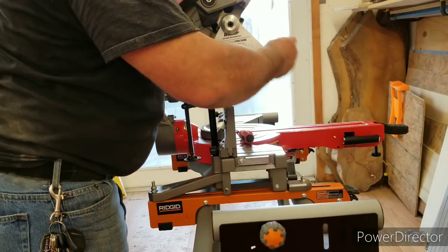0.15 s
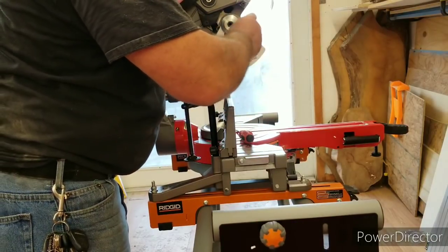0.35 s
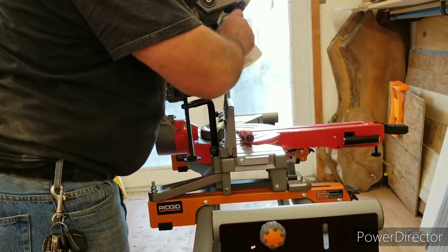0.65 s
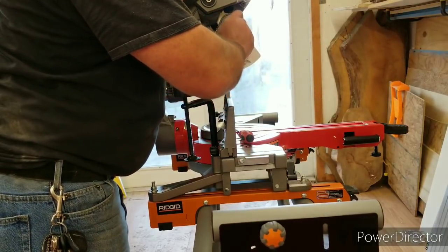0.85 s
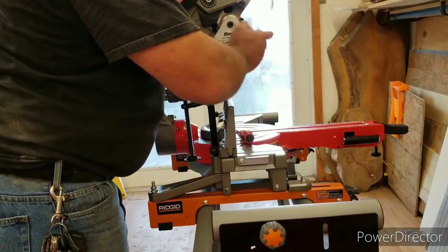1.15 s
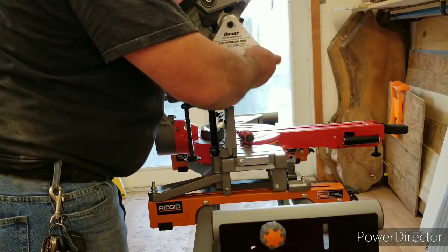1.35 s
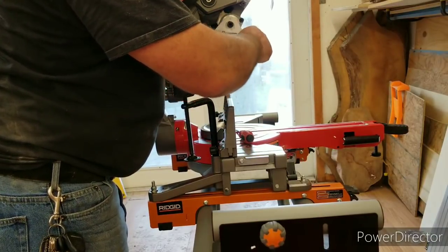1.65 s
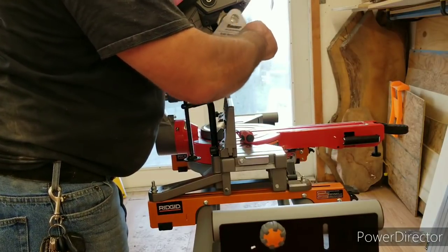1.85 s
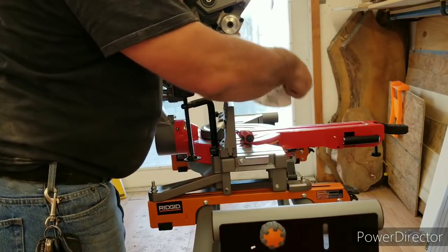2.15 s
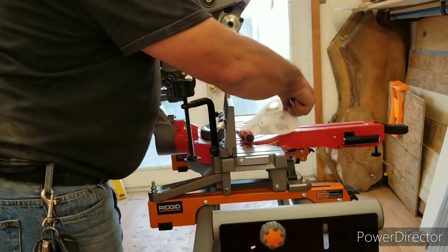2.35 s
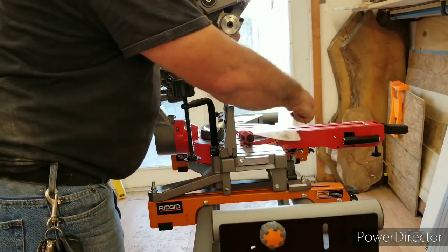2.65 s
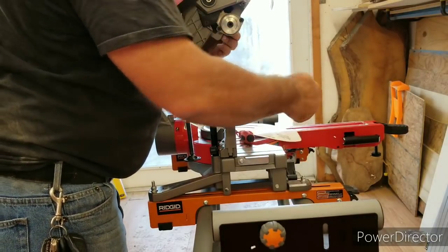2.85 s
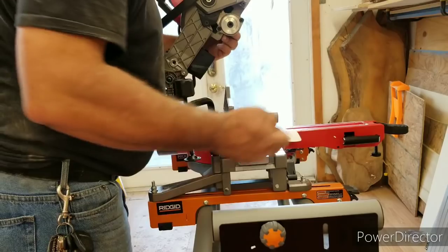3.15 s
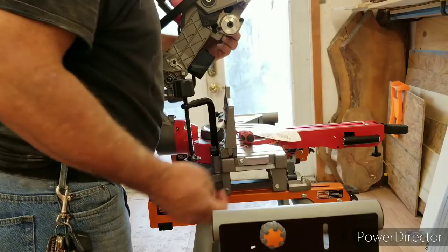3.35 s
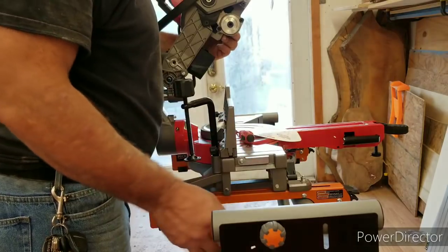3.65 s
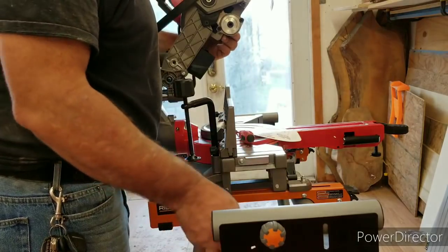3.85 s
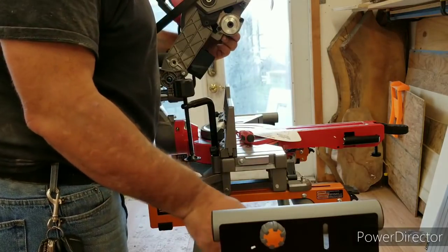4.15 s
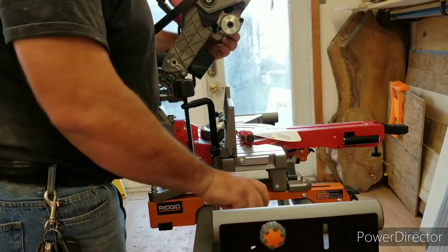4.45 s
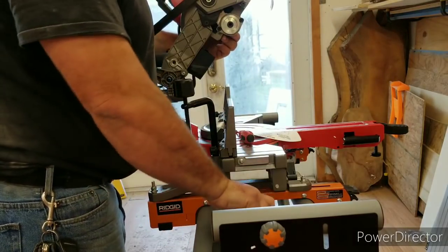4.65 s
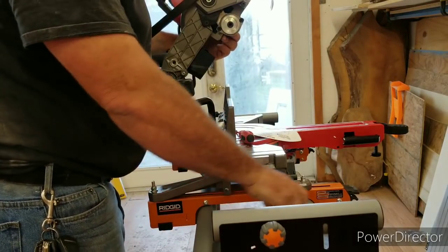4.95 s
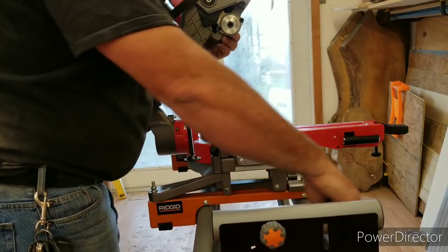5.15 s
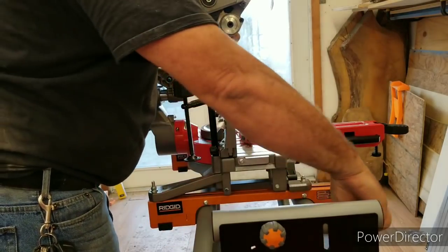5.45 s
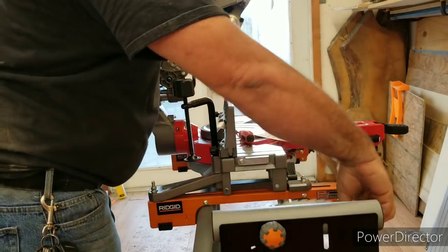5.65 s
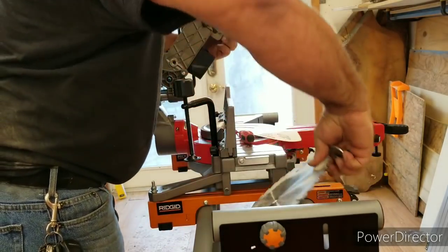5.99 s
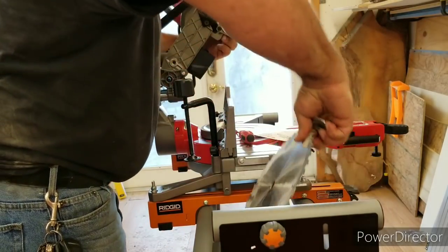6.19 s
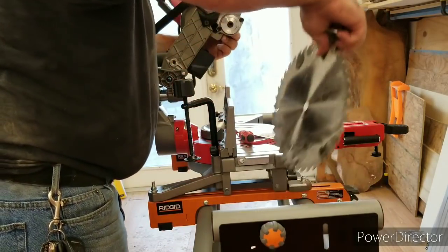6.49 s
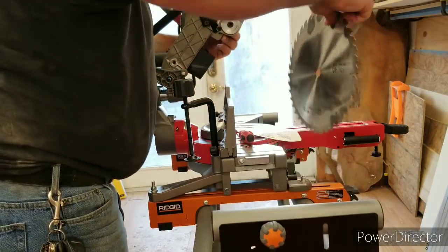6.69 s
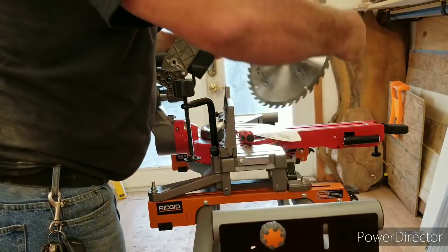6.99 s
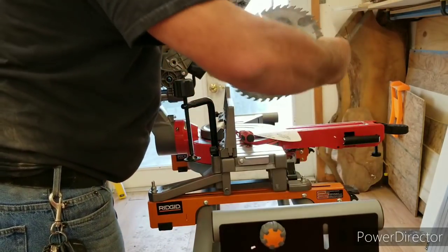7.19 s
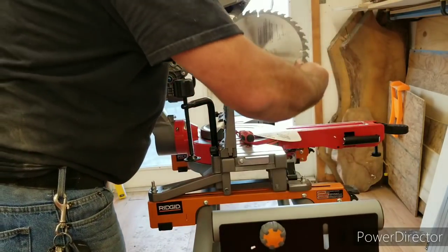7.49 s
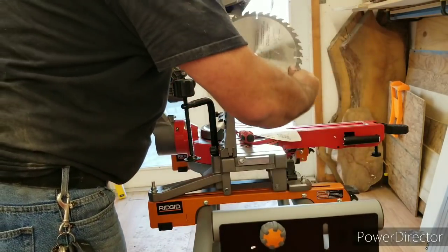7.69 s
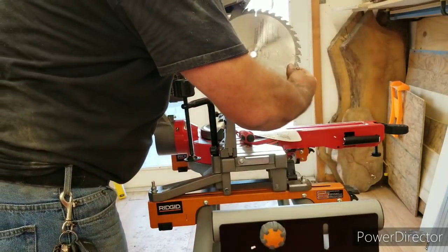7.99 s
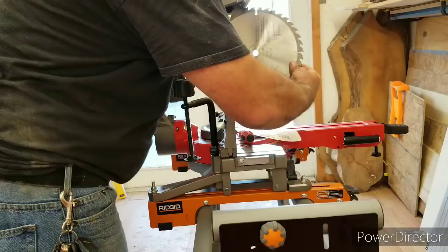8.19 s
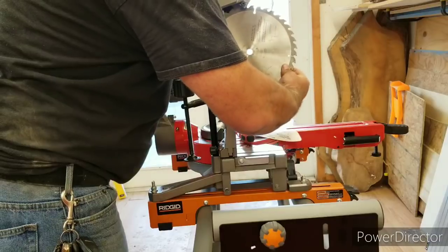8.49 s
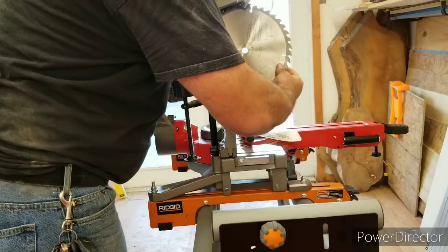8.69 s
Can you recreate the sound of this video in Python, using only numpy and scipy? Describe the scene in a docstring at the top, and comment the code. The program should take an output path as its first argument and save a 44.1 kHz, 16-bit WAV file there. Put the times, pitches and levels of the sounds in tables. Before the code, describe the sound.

Right at the start a steel wrench clatters loudly onto a saw stand, bouncing and rocking for about half a second, its clear high tones lingering past 1 second. Everything after is much quieter. A draught rumbles on the microphone around 1 second, a tiny steel part chinks at 1.3, and something knocks at 1.7. Faint rustles of hands and packaging and light taps continue to about 3.5 seconds. The draught buffets again from 3.7 to 4.6. At 5.5 a circular saw blade is picked up with a quick rattling clank and rings faintly until a dull bump stops it at 6.1. After more soft rustling, a clunk comes at 7.9 and the blade clinks against its shaft at 8.1. It grinds on briefly from 8.5, ending with a few knocks near 8.8. A low hum and short workshop reverberation lie underneath throughout.

```python
"""A steel wrench clatters down in a workshop: each bounce cracks, thuds and rings the head; clear shank
tones join in and linger. Hands and packaging rustle, parts knock on a saw stand, and a circular blade
is lifted, rings on and grinds onto its arbor. A draught buffets the two microphone ports and a low hum
fills the shop. The recorder turns itself down on the clatter and slowly comes back."""
import sys
import numpy as np
from scipy import signal
from scipy.fft import rfft, irfft, next_fast_len
from scipy.io import wavfile
from scipy.ndimage import uniform_filter1d

SR = 44100
rng = np.random.default_rng(int(sys.argv[2]) if len(sys.argv) > 2 else 0)


def generate_wav(sig):
    """Save sig (samples, or channels by samples) to the path in sys.argv[1] as 16-bit PCM at SR."""
    pcm = np.round(np.clip(np.atleast_2d(sig).T, -1, 1) * 32767).astype(np.int16)
    wavfile.write(sys.argv[1], SR, pcm)


N = 389403


def gain(db):
    """Decibels to amplitude."""
    return 10 ** (np.asarray(db) / 20)


def unit_rms(x):
    """Scales a signal to rms 1."""
    return x / np.sqrt(np.mean(x ** 2) + 1e-20)


def curve_at(points, hz):
    """Reads a breakpoint curve over log frequency."""
    f, value = np.transpose(points)
    return np.interp(np.log(hz + 1), np.log(f + 1), value)


def place(mix, at_s, sound, pan_db=0):
    """Drops a sound into the stereo mix; pan is left level minus right."""
    part = mix[:, round(at_s * SR):][:, :sound.shape[-1]]
    part += sound[..., :part.shape[1]] * gain([[pan_db / 2], [-pan_db / 2]])


def flutter(size, smooth_samples):
    """A random modulator of rms 1."""
    return unit_rms(uniform_filter1d(rng.standard_normal(size), smooth_samples))


def noise(size, spectrum, tilt_db=0):
    """Coloured noise of rms 1, tilted by tilt_db per octave."""
    hz = np.fft.rfftfreq(size, 1 / SR)
    eq_db = curve_at(spectrum, hz) + tilt_db * np.log2(hz / 2000 + .01)
    return unit_rms(irfft(rfft(rng.standard_normal(size)) * gain(eq_db), size))


def burst(spectrum, t60, tilt_db=0, rise=0.0011):
    """An impact transient: coloured noise with a fast attack and decay."""
    t = np.arange(4096) / SR
    return noise(4096, spectrum, tilt_db) * gain(-60 * t / t60) * (1 - np.exp(-t / rise))


def ring(modes, seconds, split, count=3, rise=.0011):
    """Dying sines; contact splits each mode into close, beating tones, wider for short modes."""
    hz, db, t60 = np.repeat(modes, count, axis=0).T[:, :, None]
    t = np.arange(round(seconds * SR)) / SR
    hz = hz * (1 + split / t60 * rng.standard_normal(hz.shape))
    db = db + 1.8 * rng.standard_normal(hz.shape)
    tones = gain(db - 60 * t / t60) * np.sin(2 * np.pi * (hz * t + rng.random(hz.shape)))
    return tones.sum(0) * (1 - t / seconds) * (1 - np.exp(-t / rise))


def stereo_pair(left, other, correlation, hz):
    """Blends two unrelated spectrograms into a pair with a set width in each band."""
    alike = curve_at(correlation, hz)[:, None]
    return np.array([left, alike * left + np.sqrt(1 - alike ** 2) * other])


HUM_EQ = [(15, -38), (25, -8.5), (76, -1), (144, -12.5), (211, -18), (284, 0.5), (371, -5), (425, -3),
          (620, -13), (857, -11.5), (1010, -15.5), (1280, -25.5), (6490, -39), (14200, -35.5),
          (15800, -44.5)]  # colour of the room tone: f/Hz, level/dB
HUM_CORRELATION = [(60, 0.91), (180, 0.92), (550, 0.73), (1650, -0.12), (4970, -0.36), (15000, -0.43)]  # its stereo image: f/Hz, left-right correlation


def shop_hum():
    """The bed: steady low room noise with faint drifting patches."""
    frames, hz = N // 256 + 5, np.fft.rfftfreq(1024, 1 / SR)
    left_re, left_im, other_re, other_im, patches = rng.standard_normal((frames, 513, 5)).T
    patches = unit_rms(uniform_filter1d(uniform_filter1d(patches, 10, 0), 16, 1))
    bands = stereo_pair(left_re + 1j * left_im, other_re + 1j * other_im, HUM_CORRELATION, hz)
    bands *= gain(curve_at(HUM_EQ, hz)[:, None] + 2.1 * patches)
    return gain(-55.5) * unit_rms(signal.istft(bands, nperseg=1024, noverlap=768)[1][:, :N])


DRAUGHT_FADER = [(0.0, -50, 7), (0.27, -67, -2), (0.66, -51, 0), (0.9, -39.5, 9), (1.06, -44, -4),
                 (1.25, -47, -7), (1.38, -42.5, 8), (1.57, -51.5, -10.5), (1.72, -72, 0.5), (3.12, -72, 4),
                 (3.459, -48.5, 1), (3.69, -47.5, -1.5), (3.75, -39, 10), (3.91, -35.5, 13),
                 (4.0, -39.5, 0.5), (4.3, -36, -2), (4.6, -48.5, -5), (4.69, -61, 3), (6.5, -70.5, 4.5),
                 (6.69, -48, 2.5), (6.8, -67, 0.5), (7.35, -58, -1.5), (8.83, -64, 3)]  # swells of moving air: t/s, level/dB, pan/dB
BUFFET_EQ = [(12, -39), (20, -13.5), (53, 2), (103, 1.5), (145, -6), (211, -12.5), (284, -13.5),
             (325, -19.5), (500, -37), (650, -55), (1100, -120)]  # colour of the rumble: f/Hz, level/dB
PUFFS = [(.874, -33, 109.5, 13), (0.927, -33, 110, -18), (.978, -37.5, 111, -25), (1.059, -31.5, 110, -19),
         (1.08, -35.5, 112, -23), (1.2, -38.5, 108.7, -19.5), (1.339, -34, 111, -13), (1.39, -40, 111, 3),
         (3.744, -34.5, 122, 14), (3.793, -33.5, 99, 24), (3.873, -26, 142, 22.5), (3.897, -31.5, 124, 26),
         (4.01, -34.5, 69, 11.5), (4.1, -33.5, 121, -4.5), (4.173, -28, 64.6, -12), (4.256, -33, 140, 8),
         (4.276, -38, 119.4, -18), (4.393, -37.5, 120, -9.5), (4.502, -40, 110, -9), (4.742, -42, 89, -5),
         (4.895, -46, 90, -4.5), (7.34, -39, 129, 4.5), (7.382, -43, 129, -3), (8.051, -41.5, 80.5, -0.5)]  # the strongest single puffs: t/s, level/dB, f/Hz, pan/dB


def draught():
    """Air buffets each port separately: lumpy rumble, and puffs of about one cycle."""
    times, levels_db, pans_db = np.transpose(DRAUGHT_FADER)
    t, out = np.arange(N) / SR, np.zeros((2, N))
    for port, side in enumerate((.5, -.5)):
        lumps = unit_rms(uniform_filter1d(flutter(N, 1200), 1200))
        rumble = unit_rms(noise(next_fast_len(N), BUFFET_EQ)[:N] * gain(2.9 * lumps))
        out[port] = rumble * gain(np.interp(t, times, levels_db + side * pans_db))
    for at_s, db, hz, pan_db in PUFFS:
        cycles = np.arange(4000) / SR * hz
        envelope = 2 * (1 - np.exp(-cycles / 0.2)) * np.exp(-cycles / 0.72)
        place(out, at_s, gain(db) * np.sin(2 * np.pi * cycles) * envelope, pan_db)
    return out


BOUNCES = [(.0004, -24.5, -26.5, -6), (0.011, -5, -27, 4), (0.0226, 1, -25.5, -11),
           (.036, -3.5, -26.5, -13.5), (.055, -10, -21, -15), (0.278, -9, -33.5, -11.5),
           (0.3003, -7.5, -25, -9), (.314, -5.5, -23, -18), (.329, -15, -27.5, -13.5), (.396, -19, -29, -3),
           (0.4907, -13.5, -31, -13), (.503, -19.5, -37.5, -7), (0.52, -23.5, -47, -7.5),
           (0.561, -25.5, -37, -6.5)]  # wrench hits: t/s, crack level/dB, head level/dB, thud re crack/dB
# light, even taps as it rocks: start/s, end/s, crack level/dB, head level/dB, thud re crack/dB
ROCKING = [(0.113, .25, -29, -26, -15.5), (0.35, .46, -19.5, -21.5, -10)]
CRACK_EQ = [(590, -29), (1000, -9.5), (1350, -9.5), (1860, -9.5), (2450, -9.5), (3300, -7), (4200, -3.5),
            (5200, -5), (6100, -9), (7000, -12), (10700, -12.5), (11300, -24), (12600, -24), (15500, -34)]  # bright edge of steel on the stand: f/Hz, level/dB
THUD_EQ = [(59, -49.5), (100, -18), (225, -7), (284, -10.5), (342, -5), (436, -14), (826, 1.5), (1340, -15),
           (1600, -8), (2080, -39), (3520, -120)]  # body under each hit: f/Hz, level/dB
HEAD_MODES = [(6250, -19, 0.2), (7210, -6, 0.25), (9850, -13, 0.37), (10396, 5.5, 0.26),
              (12600, -1.5, 0.28), (14815, -6.5, .3)]  # ring of the wrench head: f/Hz, level/dB, t60/s


def wrench():
    """Each hit cracks, thuds on the stand and rings the head; returns close sound and reverb send."""
    tap_gap_s, tap_tilt_db = .04, -3.5  # taps are duller than bounces
    width, grit_db = .6, 3  # share of crack power unalike at the ports; depth of its uneven snaps
    hits, head = np.zeros((2, 2, 2 * SR))
    taps = [(at_s, *levels, tap_tilt_db)
            for start, end, *levels in ROCKING for at_s in np.arange(start, end, tap_gap_s)]
    for at_s, db, head_db, thud_db, *tilt_db in BOUNCES + taps:
        centre, *sides = (burst(CRACK_EQ, 0.07, *tilt_db, rise=0.002) for _ in range(3))
        crack = np.sqrt(1 - width) * centre + np.sqrt(width) * np.array(sides)
        crack *= gain(grit_db * flutter(4096, 30))
        place(hits, at_s, gain(db) * (crack + gain(thud_db) * burst(THUD_EQ, .05)))
        ringing = np.array([ring(HEAD_MODES, 0.33, .0006, rise=0.0033) for port in range(2)])
        place(head, at_s, gain(head_db) * ringing, pan_db=-2)
    close = gain(-4.5) * hits + gain(-1) * head + gain(-2.5) * stand_scatter(hits)
    # wood and card soak up the treble
    send = signal.sosfilt(signal.butter(2, 8500, fs=SR, output="sos"), hits + head)
    return np.pad([close, send], ((0, 0), (0, 0), (0, N - 2 * SR)))


def stand_scatter(hits, spread_s=.006):
    """Early reflections: the stand throws the clatter back, differently to each port."""
    shape = (2, round(spread_s * SR))
    taps = rng.choice([-1., 1.], shape) * (rng.random(shape) < .04)
    taps = signal.sosfilt(signal.butter(1, 600, "high", fs=SR, output="sos"), taps)
    taps /= np.linalg.norm(taps, axis=1, keepdims=True)
    return signal.oaconvolve(hits, taps, axes=1)[:, :hits.shape[1]]


CLUNKS = [(.012, -2, 870), (.2785, -4, 1550), (.3, -15, 510), (.395, -21, 560), (.425, -21, 700),
          (.4915, -13, 2100), (7.8498, -18.5, 570), (7.8555, -23.5, 535), (7.872, -24, 600),
          (8.099, -29.5, 694), (8.776, -33, 480)]  # dry blows on the stand: t/s, level/dB, f/Hz


def clunks(attack_cycles=.3, decay_cycles=1.5):
    """The punch of steel landing on the stand: a few cycles, close and dry."""
    out = np.zeros((2, N))
    for at_s, db, hz in CLUNKS:
        cycles = np.arange(1500) / SR * hz
        envelope = np.exp(-cycles / decay_cycles) * (1 - np.exp(-cycles / attack_cycles))
        place(out, at_s, gain(db) * np.sin(2 * np.pi * cycles) * envelope, pan_db=1.5)
    return out


SHANK_TONES = [(.14, .11, 2495, -26.5, .9), (.2, .078, 2500, -26.5, .6), (0.223, 0.046, 2990, -27, .4),
               (0.24, .07, 1176, -34.5, .6), (.3, 0.72, 1174, -32, 1.1), (.14, 0.15, 7229, -19.5, 0.72),
               (.335, .04, 6335, -26.5, .4), (.385, .055, 8900, -21, .4), (0.334, .3, 6790, -32, 1),
               (.43, .06, 2990, -30, .8), (0.48, 0.93, 6806, -26.5, 1.07), (0.55, 0.03, 2700, -25.5, .5),
               (0.51, 0.23, 2991, -27.5, 1.1)]  # ring of the wrench shank: t/s, length/s, f/Hz, level/dB, t60/s


def shank_ring(attack_s=.008):
    """The shank sings in clear tones, some brief, some fading slowly."""
    out = np.zeros((2, N))
    for at_s, length, *mode in SHANK_TONES:
        tone = ring([mode], length, 0.00015, count=1)
        place(out, at_s, tone * np.minimum(np.arange(len(tone)) / SR / attack_s, 1))
    return out


STROKES = [(0.783, 0.021, 0.1, -66, -11), (1.316, 0.0098, 0.0082, -59.5, -5),
           (1.739, 0.02, 0.043, -64.5, -4.5), (1.938, 0.11, 0.016, -62.5, -5),
           (2.072, 0.074, 0.048, -63.5, -3.5), (2.461, .01, 0.044, -74, -13.5),
           (2.719, 0.035, 0.025, -67, -9.5), (3.2, 0.22, 0.21, -75, -3), (3.436, 0.041, 0.01, -73.5, 1.1),
           (3.618, .05, 0.0092, -79.5, 1), (3.901, 0.26, 0.27, -72, -5), (4.679, 0.059, 0.028, -61, -2.5),
           (5.342, 0.038, 0.027, -66.5, 0), (5.439, 0.035, 0.016, -52.5, -5.5),
           (5.866, 0.13, 0.046, -64.5, -0.5), (6.105, 0.013, 0.097, -63, -2.5),
           (6.459, 0.049, 0.073, -64, 2.5), (6.737, 0.04, .01, -69.5, -1.5), (8.479, 0.15, 0.12, -64, -0.5),
           (8.765, 0.076, 0.0092, -57.5, -10.5)]  # handling moves: peak t/s, rise/s, hold/s, level/dB, tilt/(dB per octave)
RUB_EQ = [(1000, -6.5), (1700, -5), (2030, -4.5), (2310, -9), (3250, -7), (6810, -2.5), (9490, 0.5),
          (15500, 0)]  # colour of the friction: f/Hz, level/dB


def rustle(swell_db=11, release_db_per_s=187):
    """Hands, card and cloth rub: dense, uneven little slips that swell, hold and die away."""
    out, t = np.zeros((2, N)), np.arange(-.4, .7, 1 / SR)
    hz = np.fft.rfftfreq(len(t), 1 / SR)
    for peak_s, rise, hold, db, tilt_db in STROKES:
        slips = noise(len(t), [(350, -87)] + RUB_EQ) * gain(2.9 * flutter(len(t), 40))
        rub = irfft(rfft(slips) * gain(tilt_db * np.log2(hz / 9000 + 0.13)), len(t))
        envelope_db = swell_db * np.minimum(t / rise, 0) - release_db_per_s * np.maximum(t - hold, 0)
        place(out, peak_s + t[0], rub * gain(db + envelope_db))
    return out


# parts set down or bumped: t/s, level/dB, f/Hz, spread/octaves, tick re level/dB, pan/dB
KNOCKS = [(0.868, -63, 4610, 0.55, 7.5, 2), (0.899, -50.5, 1280, 0.7, -20, 7),
          (1.39, -59, 2350, 0.35, -17, 3), (1.731, -37.5, 840, 0.64, -25, 3),
          (1.76, -52.5, 1220, 0.11, -2.5, 1), (1.87, -49.5, 1130, 0.36, -12, 1),
          (2.452, -55, 1790, 0.58, -10, 7.5), (2.49, -65, 2290, 0.94, -14.5, -2),
          (2.512, -60, 2200, 0.99, -14, -2), (2.716, -52.5, 1680, 0.87, -6, 1),
          (2.75, -58.5, 2000, .8, -15, 0), (2.787, -55, 1875, 0.73, -22, -2),
          (3.114, -62, 2260, 0.33, -22, 2.5), (3.143, -60.5, 2260, 0.34, -8.5, 1.5),
          (3.41, -65, 2200, 0.56, -21, 3), (4.72, -56.5, 844, 0.082, -20.5, 0),
          (6.105, -36.5, 474, 0.91, -28.5, 1), (6.112, -42.5, 750, .4, -33, 1),
          (6.135, -64.5, 2200, 0.14, -20, 1), (6.15, -50, 805, 0.29, -18, 1),
          (7.851, -28.5, 593, 0.88, -18.5, 3), (7.853, -40, 1400, .4, -18, 1),
          (7.864, -48, 2780, 0.42, -15, 0), (7.872, -36.5, 617, 0.77, -14, -7),
          (7.924, -45.5, 900, 0.76, -13.5, -7), (8.718, -42, 930, 0.91, -15, -1),
          (8.75, -38, 887, 1, -14, -3), (8.775, -38, 850, 1.45, -24, -4)]
TICK_EQ = [(180, -38), (300, -3.5), (1160, -11), (2320, -7), (4800, -11.5), (5570, -12.5), (12500, -14.5),
           (14500, -13), (15500, -76.5)]  # hard contact, of a part or of blade on arbor: f/Hz, level/dB


def knocks(settle_s=0.033, settle_db=-16.5):
    """Heavy parts thump, light ones scuff; each lands with a tick, then touches again more softly."""
    out, t = np.zeros((2, N)), np.arange(4096) / SR
    for at_s, db, hz, spread, tick_db, pan_db in KNOCKS:
        edge, lightness = 2 ** spread, np.log2(hz / 400)
        body_eq = [(hz / edge ** 3, -40), (hz / edge, -9), (hz, 0),
                   (hz * edge, -9), (hz * edge ** 3, -40)]
        body_t60 = 0.033 + 0.026 * lightness + 0.0089 / spread  # a narrow band rings longer
        thump = np.sin(2 * np.pi * hz * t) * np.exp(-.9 * hz * spread * t)
        for delay_s, softer_db in (0, 0), (settle_s, settle_db):
            scuff = burst(body_eq, body_t60, rise=0.0023)
            tick = burst(TICK_EQ, 0.15, rise=0.0045)
            touch = gain(2.5 - 5.8 * lightness) * thump + scuff + gain(tick_db) * tick
            place(out, at_s + delay_s, gain(db + softer_db) * touch, pan_db)
    return out


CHINKS = [(1.315, -40.5), (1.321, -46), (1.331, -53), (1.339, -47), (1.345, -55), (1.355, -61),
          (1.376, -52)]  # touches of a small steel part: t/s, level/dB
CHINK_MODES = [(8620, 6.5, 0.019), (9060, -4, .02)]  # its ring: f/Hz, level/dB, t60/s


def chinks():
    """A small steel part chinks in a quick run of tiny, bright pings."""
    out = np.zeros((2, N))
    for at_s, db in CHINKS:
        place(out, at_s, gain(db) * ring(CHINK_MODES, .04, .0001, count=1), pan_db=6)
    return out


LIFTS = [(5.484, -23.5, -45, 1.5), (5.505, -33.5, -55, 1), (5.515, -31, -42.5, -0.5),
         (5.545, -30, -47.5, -1.5), (5.582, -52.5, -78.5, -26), (5.62, -55, -83, 4)]  # blade hits on the stand: t/s, crack level/dB, ring level/dB, tilt/(dB per octave)
LIFT_EQ = [(88, -45), (150, -25.5), (279, 1.5), (550, -2.5), (796, -4.5), (844, -4), (1420, -6.5),
           (2180, -6), (3620, -15), (11800, -18), (15500, -24.5)]  # colour of their crack: f/Hz, level/dB
LIFT_MODES = [(296, -0.5, 0.14), (584, 2, 0.13), (880, 2.5, 0.18), (1330, 3.5, 0.058), (2010, 2.5, 0.083),
              (2120, 0.5, 0.067), (2247, 5, 0.089), (2400, -5, .07), (2530, -5, 0.15), (4450, 4, 0.041)]  # disc and stand in contact: f/Hz, level/dB, t60/s


def blade_lift():
    """The steel disc knocks the stand as it is picked up; returns cracks and rings."""
    cracks, rings = np.zeros((2, 2, N))
    for at_s, db, ring_db, tilt_db in LIFTS:
        place(cracks, at_s, gain(db) * burst(LIFT_EQ, 0.046, tilt_db, rise=0.00068))
        place(rings, at_s, gain(ring_db) * ring(LIFT_MODES, 0.25, 0.0012))
    return np.array([cracks, rings])


FREE_MODES = [(557.5, -56, 1.6), (566, -64, .9), (1625, -64, 0.6), (2985, -75, 1.2)]  # the disc clear of the stand: f/Hz, level/dB, t60/s


def blade_sustain(start_s=5.645, bump_s=6.1, choke_s=.03):
    """The lifted disc hums on until a bump chokes it."""
    out = np.zeros((2, N))
    tone = ring(FREE_MODES, 1.5, 0.0011, count=1, rise=0.0089)
    t = start_s + np.arange(len(tone)) / SR
    place(out, start_s, tone * np.clip((bump_s - t) / choke_s, 0, 1))
    return out


SEATS = [(8.098, -41, -49), (8.104, -47.5, -50), (8.11, -52, -51.5), (8.118, -51, -57), (8.124, -48.5, -49),
         (8.14, -58, -55), (8.158, -60, -55), (8.19, -68, -68), (8.738, -62, -70), (8.774, -74, -70)]  # blade touches on the arbor: t/s, crack level/dB, ring level/dB
HELD_MODES = [(952, -2, 0.087), (1403, -8, 0.11), (1643, -7, 0.11), (2255, 0, 0.066), (2500, -8, .06),
              (3440, -4, 0.05), (4170, -2, 0.064), (4230, -6, .06), (5330, -6, .05), (5600, 4, 0.065),
              (6070, -6, .05), (6350, -1, 0.051), (7220, 1, .05), (7800, 3, 0.064), (9170, -2, 0.082),
              (9700, -0.5, 0.09), (10820, 2.5, 0.053), (12450, -1, 0.056), (14010, -10, 0.056)]  # the disc damped by the hand: f/Hz, level/dB, t60/s


def blade_seat(uneven_db=2):
    """The held disc meets the arbor, each touch waking its modes unevenly; returns cracks and rings."""
    cracks, rings = np.zeros((2, 2, N))
    for at_s, db, ring_db in SEATS:
        place(cracks, at_s, gain(db) * burst(TICK_EQ, 0.12, rise=0.00079))
        modes = HELD_MODES + np.outer(rng.standard_normal(len(HELD_MODES)), [0, uneven_db, 0])
        place(rings, at_s, gain(ring_db) * ring(modes, 0.18, 0.0006, rise=0.0021))
    return np.array([cracks, rings])


SLIDE_FADER = [(8.44, -62.5), (8.514, -52), (8.64, -65), (8.674, -48.5), (8.68, -55.5), (8.767, -44),
               (8.83, -69)]  # the push along the arbor: t/s, level/dB
GRIND_BANDS = [(338, 95, 2), (702, 60, 1.5), (1035, 66, 1), (1457, 35, -3), (1710, 45, -7.5),
               (2070, 40, -10), (2270, 35, -17), (2460, 35, -12.5), (2650, 35, -17), (3250, 37, -13.5),
               (4230, 60, -18), (4750, 45, -17), (5600, 70, -21), (6460, 50, -20)]  # resonances of disc and arbor: f/Hz, width/Hz, level/dB


def blade_slide():
    """The bore grinds along the arbor: uneven slips catch each resonance at its own moments."""
    times, levels_db = np.transpose(SLIDE_FADER)
    t, out = np.arange(times[0], times[-1], 1 / SR), np.zeros((2, N))
    grind, chatter = 0, gain(3.5 * flutter(len(t), 120))
    for hz, width, db in GRIND_BANDS:
        grip = flutter(len(t), 900)
        slips = rng.standard_normal(len(t)) * gain(db + 2.3 * grip) * chatter
        grind += signal.lfilter(*signal.iirpeak(hz, hz / width, SR), slips) / np.sqrt(width / 50)
    envelope = gain(np.interp(t, times, levels_db)) * signal.windows.tukey(len(t), .05)
    place(out, times[0], unit_rms(grind) * envelope)
    return out


SHOP_DECAY = [(200, 0.38), (530, 0.36), (1400, 0.34), (3700, .36), (9700, 0.33), (12000, 0.39),
              (15000, 0.2)]  # reverb time of the workshop: f/Hz, t60/s
SHOP_CORRELATION = [(100, 1), (330, 0.67), (520, 0.81), (1000, -0.18), (2500, -0.18), (5000, 0.18),
                    (12000, -0.15)]  # stereo image of its reflections: f/Hz, left-right correlation


def shop_reverb(send):
    """Sparse reflections of random sign build up quickly; each band dies at its own speed."""
    taps = np.zeros((2, SR))
    arrivals = np.arange(200, SR - 20, 20) + rng.integers(0, 20, (2, (SR - 201) // 20))
    np.put_along_axis(taps, arrivals, rng.choice([-1., 1.], arrivals.shape), 1)
    taps *= 1 - np.exp(-np.arange(SR) / SR / 0.0035)
    hz, t, (left, other) = signal.stft(taps, SR, nperseg=256)
    bands = stereo_pair(left, other, SHOP_CORRELATION, hz)
    bands *= gain(-60 * t / curve_at(SHOP_DECAY, hz)[:, None])
    tail = signal.istft(bands, SR, nperseg=256)[1][:, :SR // 2]
    return signal.fftconvolve(send.mean(0)[None], tail / np.linalg.norm(tail[0]), axes=1)[:, :N]


STAND_PAN = [(200, 0), (700, 1.5), (1500, 1), (5000, 4), (9000, 1), (14000, -0.5)]  # how sound from the stand leans between the ports: f/Hz, pan/dB


def scene():
    """The mix: close foley and its shop reverb, the wrench mostly wet, over draught and hum."""
    wrench_close, wrench_send = wrench()
    parts = knocks() + chinks()
    cracks, rings = blade_lift() + blade_seat()
    friction = rustle() + blade_slide()
    tones = shank_ring() + blade_sustain()
    direct = wrench_close + clunks() + parts + cracks + gain(3) * rings + gain(-4) * friction + tones
    send = (gain(3) * wrench_send + gain(0.5) * (rings + parts) + gain(5.5) * cracks
            + gain(2) * friction + gain(-10) * tones)
    size = next_fast_len(N)
    lean_db = curve_at(STAND_PAN, np.fft.rfftfreq(size, 1 / SR)) * [[.5], [-.5]]
    foley = irfft(rfft(direct + shop_reverb(send), size) * gain(lean_db), size)[:, :N]
    return foley + draught() + shop_hum()


def record(dry):
    """The microphone sheds deep bass; gain control ducks fast and recovers slowly; the top is cut."""
    threshold_db, duck_db_per_db, top_hz = -22, 0.49, 15700
    heard = signal.sosfilt(signal.butter(2, 32., "high", fs=SR, output="sos"), dry)
    power_db = 10 * np.log10(abs(uniform_filter1d((heard ** 2).mean(0), 900)) + 1e-12)
    release_db = np.arange(N) * 8.2 / SR  # the detector's held peak sinks steadily
    held_db = np.maximum.accumulate(power_db + release_db) - release_db
    over_db = np.maximum(held_db - threshold_db, 0)
    ducked = heard / gain(duck_db_per_db * uniform_filter1d(over_db, 300))
    low_pass = signal.firwin(511, top_hz, window=("kaiser", 9), fs=SR)
    return signal.oaconvolve(ducked, low_pass[None], "same")


dry = scene()
out = record(dry)
generate_wav(out)
```